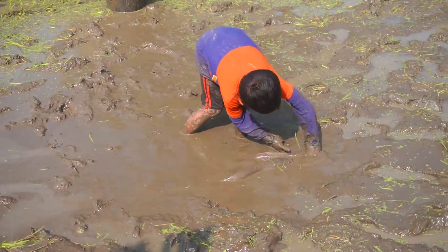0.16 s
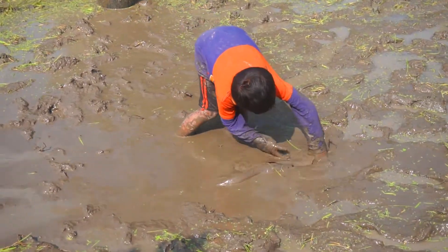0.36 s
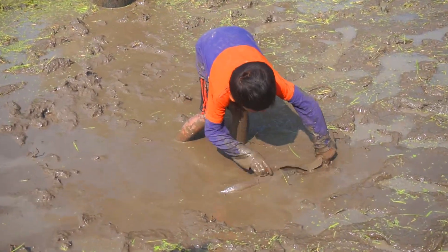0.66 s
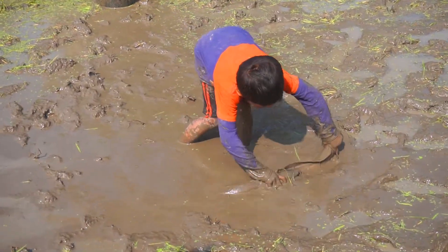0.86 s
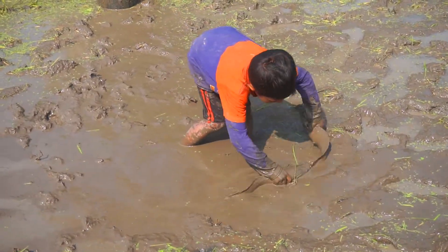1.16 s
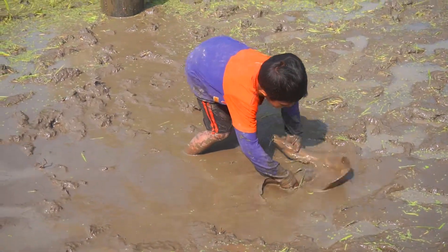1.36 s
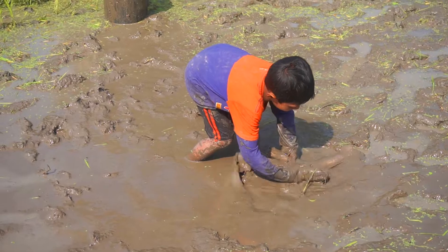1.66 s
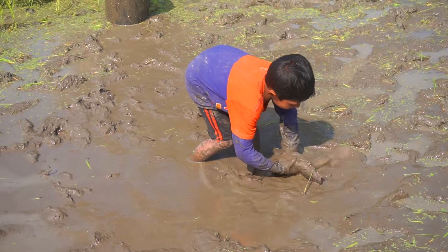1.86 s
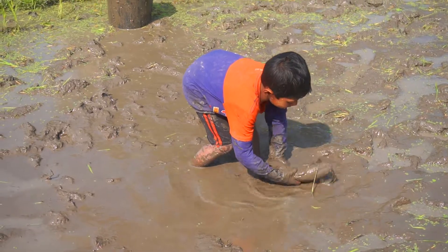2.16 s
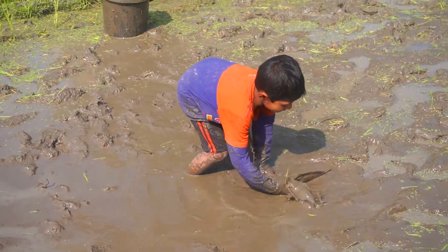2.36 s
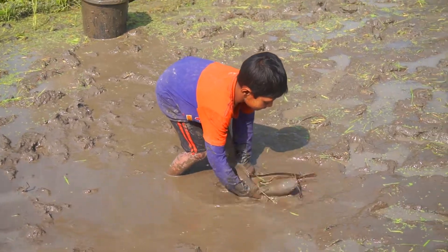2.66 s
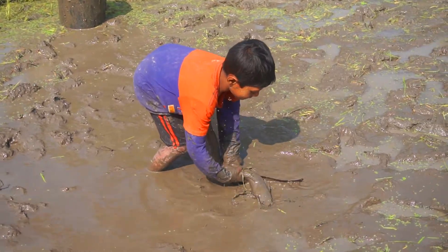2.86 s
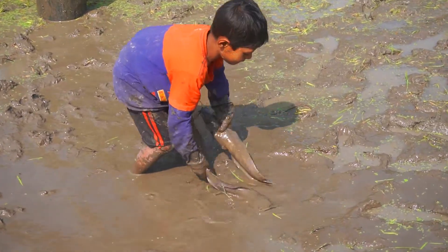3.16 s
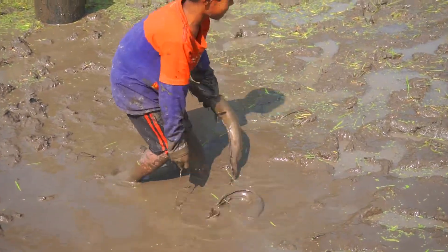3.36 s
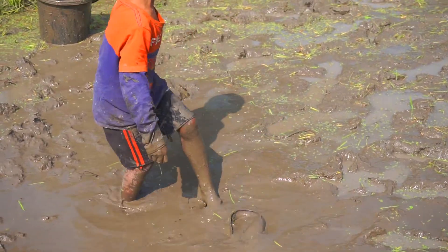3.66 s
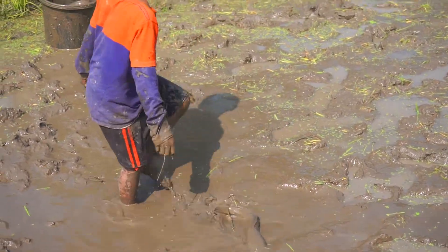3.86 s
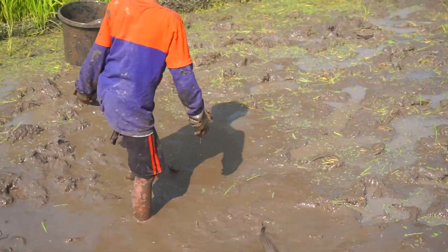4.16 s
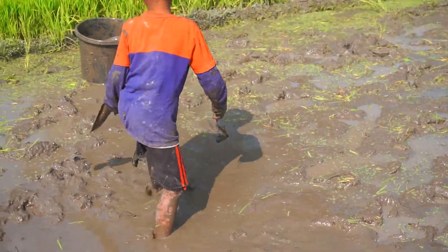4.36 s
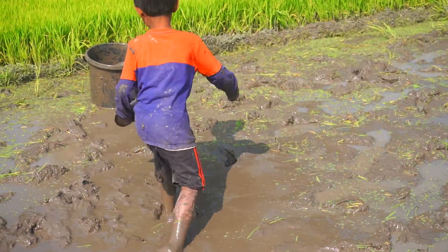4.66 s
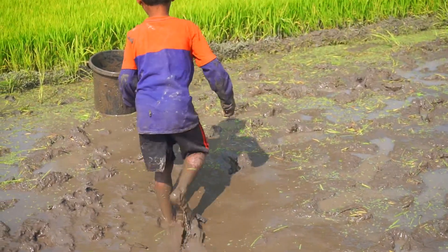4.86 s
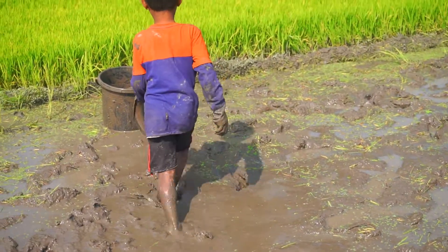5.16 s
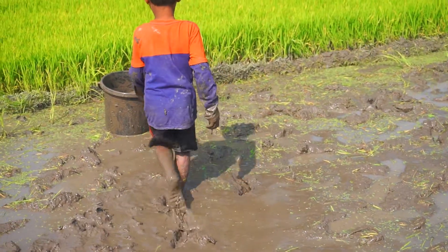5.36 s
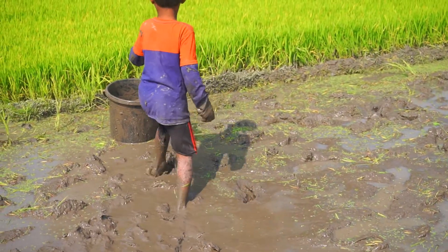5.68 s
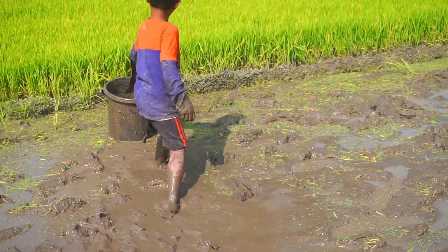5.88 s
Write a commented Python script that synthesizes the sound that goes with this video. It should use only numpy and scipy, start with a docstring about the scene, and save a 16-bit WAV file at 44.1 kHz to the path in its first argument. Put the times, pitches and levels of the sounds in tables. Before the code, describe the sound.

Hands work in shallow, watery mud, heard close and slightly right of centre in a quiet open field. At 0.1-0.2 s a few sharp wet plops burst with a tiny squirt; then only faint stirring and scattered small clicks until a soft slosh around 1.8-1.9 s. A very faint low bump comes at 2.1 s. From 2.35 to 2.9 s sticky pops and a crisp squirt cluster, thinning by 3.1 s, with light plops near 3.4. At 3.65-3.8 s comes a loud, bubbly squelch with gliding gurgles and dull double thuds from soft ground. Near silence follows, with faint distant bird chirps around 4.1 and 4.4 s. Wading starts at 4.8 s: short sucking, bubbling steps, another at 5.1, the strongest burst of plops at 5.3, then smaller squelches at 5.5, 5.7 and 5.9-6 s. Soft diffuse tail, faint hush.

```python
"""Air pockets burst in the mud of a flooded field as a child gropes in it and wades off: each is a damped cavity
resonance with the snap of a torn film, heard as single plops or, under suction, in quick gliding runs.
Water squirts through gaps as clouds of very small bubbles, each stroke of hand or foot stirs noise and bubbles,
and twice a heavy push thuds as decaying ground modes. A soft diffuse tail of decaying noise follows the mud
and a distant bird, whose notes are gliding tones; a faint outdoor hush of shaped noise lies beneath."""
import sys
import numpy as np
from scipy import signal
from scipy.fft import rfft, irfft, next_fast_len
from scipy.io import wavfile
from scipy.ndimage import uniform_filter1d

SR = 44100
rng = np.random.default_rng(int(sys.argv[2]) if len(sys.argv) > 2 else 0)


def put_to_file(sound):
    """Save the sound as 16-bit audio at rate SR, in the file named by the first command-line argument."""
    columns = np.atleast_2d(sound).T  # one column per channel
    safe = np.clip(columns, -1, 1)
    whole_steps = np.round(safe * 32767)
    wavfile.write(sys.argv[1], SR, whole_steps.astype(np.int16))


N = 265482  # length in samples

# All levels are relative: the mix applies further gains.
# Single air pockets that burst: [t/s, level/dB, f/Hz, ring time constant/ms, snap of the film/dB re the ring]
AIR_POCKETS = [(0.0865, -21, 2340, 0.83, -8), (.161, -27, 2250, 1.1, -1.5), (.166, -35.5, 633, 0.38, -2),
               (0.166, -30.5, 3130, 2.3, -14), (.189, -37.5, 3930, 2.2, -2), (0.47, -43.5, 1560, 4.2, -27),
               (.501, -40.5, 1105, 0.86, -33), (.663, -51.5, 3770, 1.8, 0.5), (.827, -40, 4670, .8, -1.5),
               (0.8333, -33.5, 1364, 1.6, 9.5), (1.373, -45, 6270, 0.93, -28), (1.492, -54, 7100, 0.53, 10),
               (1.624, -44.5, 2300, 4.3, -28), (1.821, -36, 1720, 0.93, 1.5), (1.909, -48, 870, 3.9, 4),
               (2.0032, -34.5, 3510, 1.4, -8.5), (2.3545, -23, 2220, 0.92, 2),
               (2.3571, -29.5, 1430, 2.6, -13), (2.364, -28, 1318, 5.3, -31), (2.476, -30, 4760, 0.96, -12),
               (2.488, -27.5, 2290, 2.4, -26), (2.587, -29.5, 1770, 0.45, -1),
               (2.753, -37.5, 3380, 1.2, 1.5), (2.774, -25, 3630, 0.52, 2.5),
               (2.7872, -23.5, 1450, 1.9, -50), (2.794, -25, 4000, 0.23, -2), (2.87, -37.5, 2710, 1.4, -2),
               (2.923, -43.5, 5400, 1.4, 11.5), (3.03, -40, 2375, 4.6, -1), (3.312, -46, 1206, 13, -2.5),
               (3.367, -26, 1720, 2, -9), (3.374, -29, 1420, 1.6, -11.5), (3.432, -40.5, 1540, 2.2, -2.5),
               (3.6535, -14.5, 1210, 0.72, -14), (3.655, -19, 718, 1.4, -11.5),
               (3.658, -23.5, 2560, 2.1, -2.5), (3.747, -22, 1217, 1.4, -5), (3.7655, -24.5, 1800, 2.9, -7),
               (3.9051, -36, 5360, 0.94, -0.5), (4.186, -37, 3420, 0.83, 2.5), (4.737, -43.5, 3070, 7, -20),
               (4.7482, -35.5, 2620, 1.2, -33), (4.8, -31.5, 2850, 0.97, -6), (4.837, -33, 1900, 2.7, -8),
               (4.8708, -27, 2700, 2.2, -2), (4.924, -32.5, 3060, 3.4, 0.5),
               (5.075, -23.5, 3630, 0.37, -21), (5.105, -38.5, 3240, 5.9, 2),
               (5.244, -32.5, 2170, 1.6, -1.5), (5.262, -31, 1460, 2.2, -12.5),
               (5.297, -21, 3020, 1.2, -34), (5.3135, -19.5, 2410, 1.3, -4),
               (5.3335, -16.5, 2190, 0.71, -24), (5.3368, -16.5, 3260, 0.57, -18),
               (5.4996, -30, 4300, 0.31, 0), (5.691, -30.5, 1520, 3.4, -24),
               (5.8297, -22.5, 1333, 1.17, -10), (5.869, -31.5, 1490, 4.1, -27),
               (5.8943, -22.5, 2870, .57, -24)]
# Runs of plops as a cavity widens (falling) or is squeezed (rising):
# [t/s, length/s, level/dB, first f/Hz, last f/Hz]
GURGLE_RUNS = [(0.322, 0.076, -53, 790, 610), (1.838, .048, -38.5, 1910, 1500),
               (3.673, 0.012, -30.5, 691, 530), (3.73, .03, -29.5, 502, 1763),
               (4.843, .036, -32.5, 1830, 1066), (5.271, 0.035, -24.5, 1234, 993),
               (5.961, 0.069, -41, 935, 1500)]
# Spectrum of the tearing film: [f/Hz, level/dB]
FILM_SPECTRUM = [(1200, -17.5), (3000, 0.5), (5500, -6.5), (9000, -7), (16000, -12.5)]
# Water squirting through gaps in the mud, and at 4.16 s a faint swell near 2.6 kHz that goes with the bird's
# chirp: [t/s, level/dB, f/Hz, spread/octaves, rise time/s]
WATER_SQUIRTS = [(.05, -51, 11700, 0.37, 0.0022), (0.0862, -40.5, 6900, 0.24, 0.0012),
                 (.5, -67.5, 2040, 0.29, 0.16), (.835, -57.5, 2590, 0.77, 0.039),
                 (.835, -51, 5020, 0.067, 0.031), (0.838, -54, 7330, 0.15, 0.029),
                 (1.538, -56, 9200, 0.41, 0.01), (1.1, -86, 3130, 0.083, 0.26),
                 (1.531, -65, 2140, 0.37, 0.15), (1.816, -46, 10200, 0.74, 0.0076),
                 (1.928, -49.5, 6400, 1, 0.0092), (2.473, -34, 9000, 0.63, 0.004),
                 (3.06, -55.5, 688, 0.51, 0.055), (3.724, -42, 9670, 0.38, 0.0059),
                 (3.76, -33, 4540, 1.2, 0.004), (4.16, -60, 2600, 0.2, 0.019),
                 (4.186, -44, 11540, 0.36, 0.0013), (5.054, -43.5, 7620, 0.77, 0.0084),
                 (5.665, -47.5, 9200, 0.7, 0.014)]
# Strokes of a hand or foot:
# [t/s at the height, rise/s, fall/s, large bubbles level/dB, small bubbles level/dB, fizz level/dB]
MUD_STROKES = [(0.168, 0.022, 0.039, -46.5, -45, -143), (.35, 0.26, 0.17, -62, -77, -103),
               (.53, 0.08, 0.2, -59.5, -88, -80.5), (.75, 0.21, 0.034, -68.5, -74, -101),
               (.9, 0.1, 0.33, -95, -70, -89), (1.57, 0.083, 0.05, -98.5, -62.5, -67),
               (1.892, 0.1, 0.1, -58, -55.5, -53), (2.42, 0.01, 0.17, -65, -51.5, -69.5),
               (2.618, 0.028, .07, -50, -57, -55), (2.798, 0.09, 0.2, -52, -54, -62),
               (3.14, 0.037, .09, -54, -59.5, -109), (3.42, 0.09, 0.16, -62.5, -56, -79.5),
               (3.681, 0.011, 0.042, -63, -38, -59), (3.768, 0.039, .055, -55.5, -38, -46),
               (4.21, 0.11, 0.084, -72, -92, -70), (4.861, 0.038, 0.038, -88, -36, -48.5),
               (5.09, 0.092, 0.046, -70.5, -49.5, -49.5), (5.327, 0.05, 0.061, -53, -35.5, -43),
               (5.512, 0.068, 0.039, -62, -47, -53), (5.698, 0.015, 0.015, -83, -44, -53),
               (5.881, 0.059, 0.045, -58.5, -49.5, -59.5), (6.01, 0.045, .08, -58, -47, -87)]
# Resting mud between strokes: [large bubbles level/dB, small bubbles level/dB, fizz level/dB]
RESTING_LEVELS = [-78.5, -75, -87.5]
# Spectra of the wash and bubbles, for large bubbles, small bubbles and fizz: [f/Hz, level/dB]
LARGE_BUBBLE_SPECTRUM = [(150, -13), (350, -14), (550, -8.5), (900, -2), (1400, 2), (2200, -26),
                         (5000, -35.5)]
SMALL_BUBBLE_SPECTRUM = [(600, -42), (1200, -7.5), (1800, -2), (2600, -3), (4200, -15), (6500, -23.5),
                         (12000, -51)]
FIZZ_SPECTRUM = [(2000, -33), (4000, 10.5), (5500, -3), (8000, 1), (12000, 1), (16000, -5.5)]
# Sideways place of the mud sounds: [t/s, left minus right level/dB]
MUD_BALANCE = [(0, -2), (.8, -5.5), (2.35, -6), (2.8, -2.5), (3.6, -3), (5.1, -2.5), (6, -2)]
# Heavy pushes into the ground: [t/s, level/dB, ring time constant/ms]
HEAVY_PUSHES = [(2.1, -47, 14), (2.117, -44.5, 7.1), (3.683, -38, 10), (3.719, -34.5, 29),
                (3.756, -37.5, 28), (3.808, -44, 24)]
# Modes of the soft ground: [mean f/Hz, level/dB, ring time as a share of the push's]
SOFT_GROUND_MODES = [(49, -5, 0.99), (120.3, 0.5, 1.3), (184.4, -0.5, 0.57), (241, -4.5, 0.53)]
# Weight bearing down on the soft ground: [t/s at the height, rise/s, fall/s, level/dB]
WEIGHT_SHIFTS = [(.4, 0.17, 0.45, -70), (2.14, .1, 0.11, -55.5), (2.46, 0.11, 0.11, -55.5),
                 (3.13, 0.066, 0.082, -59), (3.71, 0.035, 0.04, -38.5), (3.8, 0.031, 0.037, -37.5),
                 (4.2, 0.11, .1, -67.5)]
# Spectrum of the ground's rumble: [f/Hz, level/dB]
RUMBLE_SPECTRUM = [(15, -14), (30, -2), (50, 1.5), (90, 4), (140, -4), (250, -11), (400, -24), (1000, -54)]
# Decay of the diffuse tail: [f/Hz, time to fall by 60 dB/s]
TAIL_DECAY = [(100, 0.52), (500, 0.39), (1500, 0.41), (4000, 0.32), (9000, 0.51), (16000, 0.24)]
# Colour of the diffuse tail: [f/Hz, level/dB]
TAIL_SPECTRUM = [(60, -16), (500, -1.5), (1500, -7), (4000, 3.5), (9000, -5.5), (16000, 8.5)]
# A distant bird's chirps and thin whistles: [t/s, level/dB, first f/Hz, last f/Hz, length/s]
BIRD_NOTES = [(0.255, -76, 4960, 5340, 0.38), (2.024, -72.5, 5180, 5680, 0.28),
              (3.099, -54.5, 4980, 4140, 0.028), (3.958, -66, 5700, 5820, 0.077),
              (4.085, -52.5, 5540, 3950, 0.029), (4.41, -53, 5500, 3510, 0.019),
              (4.776, -46, 5270, 3800, 0.014), (5.596, -59, 5470, 5760, 0.037)]
# Spectrum of the outdoor hush: [f/Hz, level/dB]
HUSH_SPECTRUM = [(20, 1), (150, -10), (400, -11), (1000, -1.5), (2200, -6), (5000, -20.5), (16000, -28.5)]

GURGLE_CYCLES, GURGLE_SNAP_DB = 2.66, -6.5  # ring time constant in cycles; snap re the ring
GURGLE_JITTER_S, GURGLE_SWELL_DB = 0.0012, -2  # spread of the timing; change of level over a run
LESSER_DB = -10  # bubbles around a plop re its listed level, before a random further cut
FIZZ_CYCLES = 2.2  # the smallest bubbles are mere clicks
BUBBLING_DB = 7  # bubbles over the wash in the hardest stroke
BUBBLING_GROWTH = 0.18  # dB of that gained per dB of stirring
RUMBLE_FLOOR_DB = -74
TOP_HZ = 16150


def amp(db):
    """Level definition: decibels become an amplitude ratio."""
    return 10 ** (np.asarray(db) / 20)


def unit(x):
    """Normalisation: scale a signal to rms 1."""
    return x / np.sqrt(np.mean(x ** 2) + 1e-20)


def along(points, hz):
    """Interpolation of (f/Hz, value) points along a logarithmic frequency axis."""
    f, value = np.transpose(points)
    return np.interp(np.log(hz + 1), np.log(f + 1), value)


def curves(rows):
    """Linear interpolation in time: one value per sample for each column after t/s."""
    s, *columns = np.transpose(rows)
    return [np.interp(np.arange(N) / SR, s, column) for column in columns]


def filtered(x, gain):
    """Linear filtering: multiply the spectrum by a frequency-dependent gain."""
    n = x.shape[-1]
    m = next_fast_len(n + 8192)  # zero padding
    return irfft(rfft(x, m) * gain(np.fft.rfftfreq(m, 1 / SR)), m)[..., :n]


def coloured(x, spectrum):
    """Spectral shaping: filter by the given spectrum, then scale to rms 1."""
    return unit(filtered(x, lambda hz: amp(along(spectrum, hz))))


def add(track, s, sound):
    """Superposition: mix a sound into a track at time s."""
    i = max(0, round(s * SR))
    part = track[..., i:i + sound.shape[-1]]
    part += sound[..., :part.shape[-1]]


def swells(rows):
    """Exponential growth and decay of movements (t, rise, fall, level), summed in power to one gain."""
    t = np.arange(N) / SR
    power = np.zeros(N)
    for s, rise, fall, db in rows:
        distance = np.maximum((s - t) / rise, (t - s) / fall).clip(0, 30)
        power += (amp(db) * np.exp(-distance)) ** 2
    return np.sqrt(power)


def ring(t, hz, life, glide, onset):
    """Damped resonance: a note swells over about onset cycles, drifts by glide in pitch and decays."""
    pitch = hz * (1 + glide * (1 - np.exp(-t / (2 * life))))
    tone = np.sin(2 * np.pi * np.cumsum(pitch, -1) / SR)
    return tone * np.exp(-t / life) * (1 - np.exp(-t * hz / onset)) ** 2


def bubbles(rate, hz, spread, cycles, scatter_db, size=N):
    """Random superposition: damped bubble notes of random pitch, strength and stereo place, at rms 1."""
    count = int(rate * size / SR) + 1  # rate is bubbles per second
    start = rng.integers(0, size, (count, 1))
    octave, life, strength, place = rng.standard_normal((4, count, 1))
    pitch = np.clip(hz * 2 ** (spread * octave), 200, SR / 2.8)
    k = np.arange(SR // 80)
    notes = ring(k / SR, pitch, cycles * amp(7.6 * life) / pitch, glide=0.11, onset=0.043)
    notes *= amp(scatter_db * np.minimum(strength, 2))
    when = (start + k).ravel()
    sides = []
    for side in (1, -1):
        placed = notes * amp(side * 3.1 * place)
        sides.append(np.bincount(when, placed.ravel(), size)[:size])
    return unit(np.array(sides))


def pops():
    """Cavity resonance: a wet film snaps, its air pocket rings briefly, and lesser bubbles burst around it."""
    out, t = np.zeros(N), np.arange(SR // 16) / SR
    for s, db, hz, life_ms, snap_db in AIR_POCKETS + gurgles(count=4):
        note = ring(t, hz, life_ms / 1000, glide=0.048, onset=1.0)
        film = coloured(rng.standard_normal(len(t)), FILM_SPECTRUM)
        tear = np.exp(-t / 0.001) + amp(-7.5) * np.exp(-t / 0.01)  # loose droplets follow the snap

        def film_gain(f):
            """Radiation: a soft snap is dull, and a pocket radiates little below its own note."""
            dull = 1 / np.hypot(1, f / (9000 * amp(snap_db * 6.9)))
            small = 1 - np.exp(-(f / (0.78 * hz)) ** 2)
            return dull * small

        snap = filtered(film * tear, film_gain)
        plop = note / np.abs(note).max() + amp(snap_db) * snap / np.abs(snap).max()
        add(out, s, amp(db - 3.0) * plop)
        for delay, octave, strength in rng.standard_normal((7, 3)):
            pitch = hz * 2 ** (0.4 * np.clip(octave, -1, 2) + 0.23)
            lesser = ring(t, min(pitch, SR / 3), 3.5 / pitch, glide=0.053, onset=1.0)
            level = db + LESSER_DB - 1.17 * abs(strength)
            add(out, s - 0.003 + 0.015 * abs(delay), amp(level) * lesser)
    return out


def gurgles(count):
    """Changing cavity size: the plops of a run follow almost evenly while their pitch glides."""
    plops = []
    for s, length, db, first_hz, last_hz in GURGLE_RUNS:
        for u, slip in zip(np.linspace(0, 1, count), rng.standard_normal(count)):
            hz = first_hz * (last_hz / first_hz) ** u
            when = s + u * length + GURGLE_JITTER_S * slip
            level = db + GURGLE_SWELL_DB * (u - 0.5)
            plops.append((when, level, hz, 1000 * GURGLE_CYCLES / hz, GURGLE_SNAP_DB))
    return plops


def squirts():
    """Band-limited bubble noise: each squirt is a cloud of very small bubbles that swells and dies away."""
    out = np.zeros((2, N))
    for s, db, hz, spread, rise in WATER_SQUIRTS:
        u = np.arange(SR // 2) / SR / rise  # time in units of the rise
        cloud = bubbles(rate=4000, hz=hz, spread=spread, cycles=0.28, scatter_db=2.5, size=len(u))
        jet = unit(filtered(cloud, lambda f: np.exp(-0.5 * (np.log2((f + 1) / hz) / spread) ** 2)))
        add(out, s, amp(db) * jet * u * np.exp(1 - u))
    return out


def churn():
    """Stirred two-phase flow: strokes raise a wash and, the harder they are, more bubble sound, in three sizes."""
    swarms = [bubbles(rate=550, hz=792, spread=0.599, cycles=2.2, scatter_db=7.0),
              bubbles(rate=1500, hz=2315, spread=0.524, cycles=4, scatter_db=10.5),
              bubbles(rate=440, hz=9360, spread=0.513, cycles=FIZZ_CYCLES, scatter_db=7.5)]
    spectra = (LARGE_BUBBLE_SPECTRUM, SMALL_BUBBLE_SPECTRUM, FIZZ_SPECTRUM)
    s, rise, fall, *levels = np.transpose(MUD_STROKES)
    out = np.zeros((2, N))
    for swarm, spectrum, db, rest_db in zip(swarms, spectra, levels, RESTING_LEVELS):
        # noise common to both ears and noise of each ear's own
        flow = rng.standard_normal(N) + amp(12.5) * rng.standard_normal((2, N))
        wash = coloured(flow, spectrum)
        stir = swells(zip(s, rise, fall, db))
        bubbling = amp(BUBBLING_DB) * (stir / stir.max()) ** BUBBLING_GROWTH
        mixture = (wash + bubbling * coloured(swarm, spectrum)) / np.hypot(1, bubbling)
        out += amp(-3.0) * np.hypot(stir, amp(rest_db)) * mixture
    return out


def ground():
    """Modal response: soft ground gives dull thuds and a lumpy rumble, a little different at each ear."""
    thuds, t = np.zeros((2, N)), np.arange(SR // 3) / SR
    for s, db, life_ms in HEAVY_PUSHES:
        for hz, mode_db, share in SOFT_GROUND_MODES:
            pitch = hz * (1 + 0.03 * rng.standard_normal((2, 1)))
            note = ring(t, pitch, share * life_ms / 1000, glide=0, onset=0.35)
            add(thuds, s, amp(db + mode_db) * note / np.abs(note).max())
    shake = rng.standard_normal(N) + 0.28 * rng.standard_normal((2, N))
    rumble = coloured(shake, RUMBLE_SPECTRUM)
    rumble_gain = np.hypot(swells(WEIGHT_SHIFTS), amp(RUMBLE_FLOOR_DB))
    return (thuds + rumble_gain * rumble) * amp([[0.9], [-0.9]])  # slightly to the left


def tail(x):
    """Diffuse decay: convolution with noise, unrelated in the ears, each frequency dying at its own speed."""
    out, size = np.zeros((2, N)), SR // 4
    for i in range(0, N, size):  # fresh noise for each quarter second
        hz, t, z = signal.stft(rng.standard_normal((2, SR)), SR, nperseg=256)
        level = along(TAIL_SPECTRUM, hz)[:, None] - 60 * t / along(TAIL_DECAY, hz)[:, None]
        decay = amp(level) * (1 - np.exp(-t / 0.023))  # soft build-up
        echo = signal.istft(z * decay, SR, nperseg=256)[1]
        echo = echo / np.linalg.norm(echo[0])
        add(out, i / SR, signal.fftconvolve(x[None, i:i + size], echo, axes=1))
    return out


def bird():
    """Frequency modulation: short gliding tones made husky by a random quaver of pitch."""
    out = np.zeros(N)
    for s, db, first_hz, last_hz, length in BIRD_NOTES:
        u = np.linspace(0, 1, int(length * SR))
        quaver = unit(uniform_filter1d(rng.standard_normal(len(u)), size=30))
        pitch = (first_hz + (last_hz - first_hz) * u) * (1 + 0.045 * quaver)
        tone = np.sin(2 * np.pi * np.cumsum(pitch) / SR)
        add(out, s, amp(db) * tone * np.abs(np.sin(np.pi * u)) ** 0.5)
    return out


def hush():
    """Stationary shaped noise, partly common to both ears: the faint outdoor background."""
    noise = rng.standard_normal(N) + rng.standard_normal((2, N))
    return amp(-81) * coloured(noise, HUSH_SPECTRUM)


def scene():
    """Superposition: mud a little to the right, a bird heard mostly through the tail, ground and hush."""
    mud, song = pops() + squirts() + churn(), bird()
    pan = amp(curves(MUD_BALANCE)[0] * np.array([[0.5], [-0.5]]))
    diffuse = amp(-7.0) * tail(mud.mean(0) + amp(5.5) * song)
    return (mud + diffuse) * pan + amp(-5.5) * song + ground() + hush()


def record(dry):
    """Band limitation: the recorder keeps nothing above its upper limit."""
    return filtered(dry, lambda hz: hz < TOP_HZ)


dry = scene()
out = record(dry)
put_to_file(out)
```